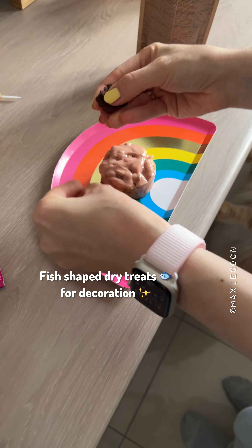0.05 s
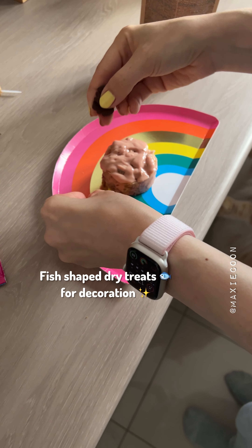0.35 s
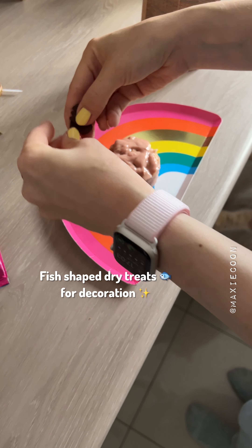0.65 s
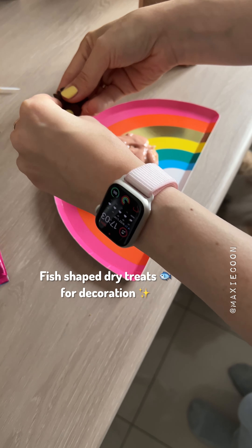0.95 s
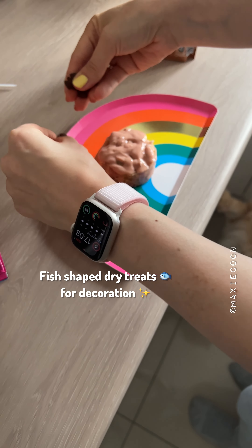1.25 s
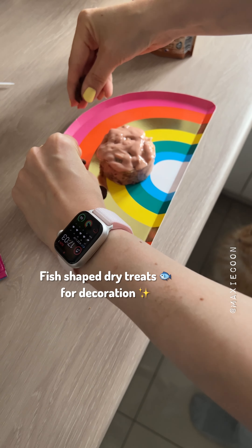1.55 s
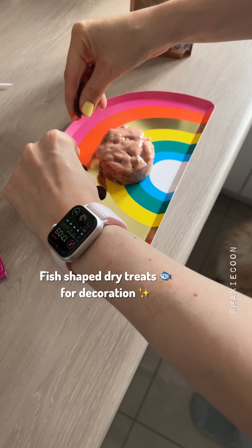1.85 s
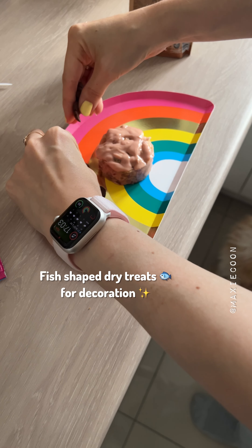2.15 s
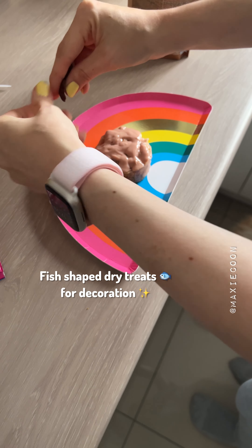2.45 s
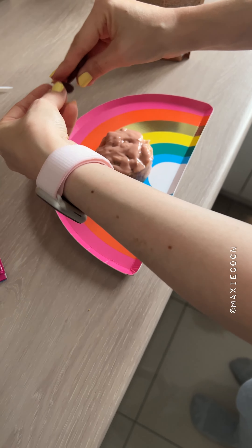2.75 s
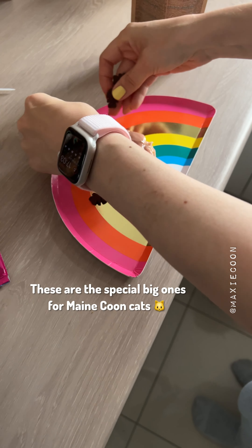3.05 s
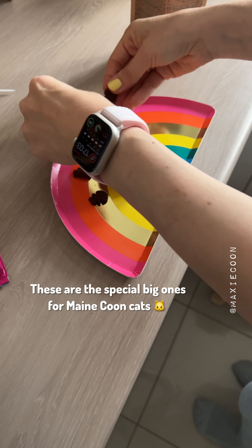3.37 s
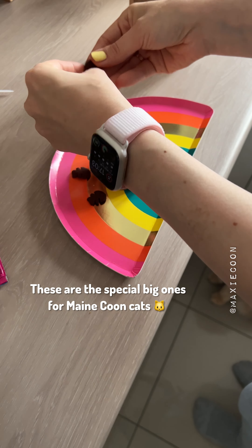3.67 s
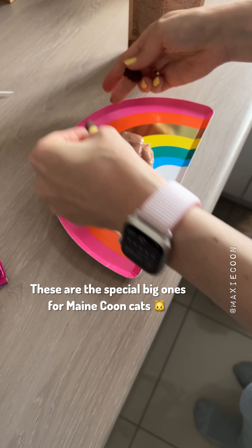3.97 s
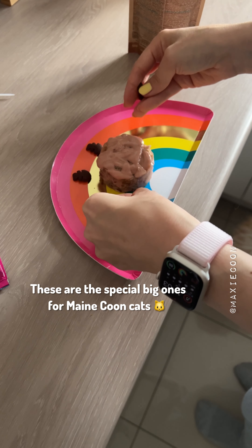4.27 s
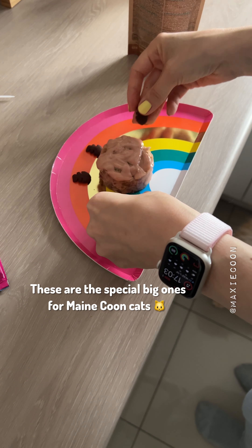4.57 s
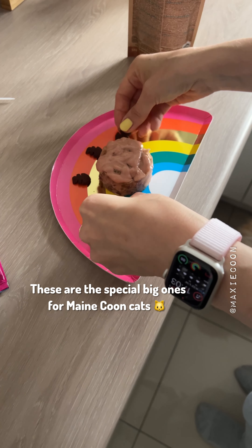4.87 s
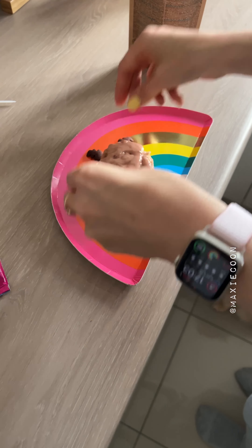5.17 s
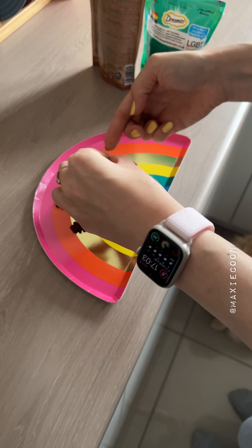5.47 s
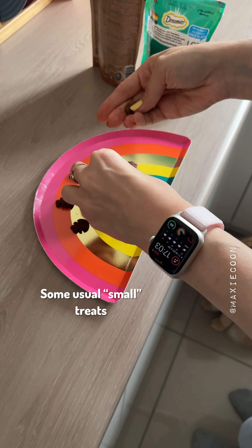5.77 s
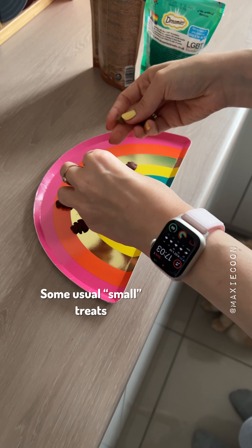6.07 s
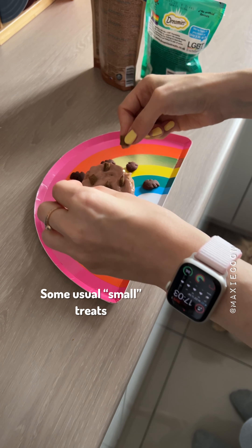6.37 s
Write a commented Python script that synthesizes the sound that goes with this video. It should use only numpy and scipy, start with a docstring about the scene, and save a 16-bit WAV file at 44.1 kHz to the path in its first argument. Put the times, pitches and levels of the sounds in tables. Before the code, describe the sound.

Dry treats tick together in a hand and land on a paper plate with crisp taps and faint scraping.

```python
"""Cat treats on a paper plate

Hard dry treats are picked from a hand and set one by one on a paper plate on a kitchen counter.
Each contact knocks the plate, snaps on the crust and rings the treat. In between, treats scrape,
fingers rub and a hand thumps the counter. A small kitchen answers, over faint hum and room noise."""
import sys
import numpy as np
from scipy import signal
from scipy.fft import rfft, irfft
from scipy.io import wavfile
from scipy.ndimage import uniform_filter1d

SR = 44100
rng = np.random.default_rng(int(sys.argv[2]) if len(sys.argv) > 2 else 0)


def unload_audio(sound):
    """Save the sound as a 16-bit wav file, at the path given as the first command line argument."""
    columns = np.transpose(np.atleast_2d(sound))
    # keep every value between -1 and 1, then stretch to whole-number steps
    steps = np.round(np.clip(columns, -1, 1) * 32767)
    wavfile.write(sys.argv[1], SR, steps.astype(np.int16))


N = 287550


def amp(db):
    """Decibels to gain."""
    return 10 ** (np.asarray(db) / 20)


def unit_rms(x):
    """Scales to rms 1."""
    return x / np.sqrt(np.mean(x ** 2) + 1e-20)


def curve(points, hz):
    """Reads a table on a log-frequency axis."""
    f, value = np.transpose(points)
    return np.interp(np.log(hz + 1), np.log(f + 1), value)


def add(mix, s, sound):
    """Mixes a sound in at time s."""
    part = mix[..., max(round(s * SR), 0):][..., :sound.shape[-1]]
    part += sound[..., :part.shape[-1]]


def sharpest_click(gain):
    """The minimum-phase impulse with this magnitude spectrum."""
    log_gain = np.log(np.maximum(np.r_[gain, gain[-2:0:-1]], 1e-5))
    return np.fft.ifft(np.exp(np.conj(signal.hilbert(log_gain)))).real


def stereo_pair(spectra, correlation, hz):
    """Blends two unrelated spectra to set the stereo width at each frequency."""
    same = np.clip(curve(correlation, hz), -1, 1)
    return np.array([spectra[0], same * spectra[0] + np.sqrt(1 - same ** 2) * spectra[1]])


# Room tone EQ: f/Hz, relative level/dB
AIR_EQ = [(15, -41), (27, -28), (38, -11.5), (53, -6.5), (76, -15), (108, -8.5), (135, -20), (212, -19),
          (300, -22), (450, -25.5), (700, -25.5), (2100, -35.5), (14000, -43.5), (16000, -54.5)]
# Room tone stereo image: f/Hz, left-right correlation
AIR_IMAGE = [(30, 1), (60, 0.77), (130, 0.39), (290, -0.25), (640, -0.87), (1400, -0.47), (3100, 0.59),
             (15000, -0.29)]
# The hiss level over time, with one brief dip: t/s, gain/dB
HISS_LEVEL = [(0, 1.5), (2.5, 0), (4.4, -0.5), (5.295, 1), (5.302, -19), (5.325, -0.5), (6.5, -2)]
# Mains hum partials: f/Hz, rms level/dB
MAINS_HUM = [(49.5, -69.5), (100, -78)]


def room_tone(air_db=-62, waver=0.23, split_hz=200):
    """Rumble and hiss under a mains hum that wavers in level and phase."""
    hz, t = np.fft.rfftfreq(N, 1 / SR), np.arange(N) / SR
    spectra = stereo_pair(rfft(rng.standard_normal((2, N))), AIR_IMAGE, hz) * amp(curve(AIR_EQ, hz))
    air = amp(air_db) * unit_rms(irfft(spectra, N))
    rumble = irfft(rfft(air) / (1 + (hz / split_hz) ** 4), N)
    hiss = (air - rumble) * amp(np.interp(t, *np.transpose(HISS_LEVEL)))
    knots = np.linspace(0, t[-1], num=40)
    drift = np.interp(t, knots, rng.standard_normal(len(knots)))
    hum = sum(amp(db) * np.sqrt(2) * np.sin(2 * np.pi * f * t + waver * drift) for f, db in MAINS_HUM)
    return rumble + hiss + hum * (1 + waver * drift)


# The plate's boxy knock: f/Hz, gain/dB
KNOCK_EQ = [(40, -17), (150, -11.5), (330, -4.5), (550, -3), (900, 0), (1400, -5.5), (2200, -13.5),
            (5000, -27), (16000, -57)]
# The crust's bright snap: f/Hz, gain/dB
SNAP_EQ = [(40, -32.5), (400, -20), (1000, -12), (1800, -5), (2700, -2), (4500, -0.5), (6000, -4.5),
           (8000, -13.5), (11000, -32.5), (16000, -51)]
# Fine grit on top: f/Hz, gain/dB
GRIT_EQ = [(40, -33.5), (1500, -23), (5000, -9.5), (7500, 0.5), (10000, -7.5), (13000, -4), (16000, -17.5)]


def contact(knock_db, snap_db, grit_db, ring_db, ring_hz, octaves, chatter_s,
            firm_s=0.0012, rise=0.47, size=4096):
    """A first touch and a quick chatter of the rough crust drive plate, crust and the treat's ring."""
    hz, t = np.fft.rfftfreq(size, 1 / SR), np.arange(size) / SR
    knock = amp(knock_db + curve(KNOCK_EQ, hz))
    snap = amp(snap_db + curve(SNAP_EQ, hz))
    grit = amp(grit_db + curve(GRIT_EQ, hz))
    ring = amp(ring_db) / (1 + abs(np.log2((hz + 1) / ring_hz) / octaves) ** 3)
    body = sharpest_click(np.linalg.norm([knock, snap, grit, ring], axis=0))
    # a gentle landing is all chatter; a firm one is mostly its first touch
    force = rng.standard_normal(size) * np.exp(-t / chatter_s) * (1 - np.exp(-t / (rise * chatter_s)))
    force *= chatter_s / firm_s / np.linalg.norm(force)
    force[0] += 1
    # the chatter smears the transient but leaves its broad colour alone
    spectrum = rfft(force)
    broad_power = uniform_filter1d(abs(spectrum) ** 2, size=50)
    spectrum *= rfft(sharpest_click(broad_power ** -.5))
    return signal.fftconvolve(irfft(spectrum), body)[:size]


# Treats tick on each other and on fingernails:
# t/s, snap/dB, grit/dB, ring/dB, ring/Hz, chatter/s, room send/dB
HAND_CLICKS = [ (0.1776, -48, -39, -30, 7000, 0.0021, 0), (0.191, -39, -30, -40, 8000, 0.0021, -4),
               (0.6720, -24, -24.5, -18.5, 2150, 0.0007, -2), (0.7282, -32, -24.5, -24, 2320, .0009, 5.5),
               (0.7724, -10.5, -32, 5.5, 2250, 0.0015, -4), (0.905, -35, -26.5, -18.5, 7040, 0.00046, -4.5),
               (1.0359, -44, -21.5, -14.5, 10600, .0005, -1), (1.057, -22.5, -23.5, -23, 8450, 0.006, 1.5),
               (1.1677, -28, -24.5, -19, 7700, .0015, -2), (1.1862, -12.5, -8.5, -2.5, 7360, 0.0036, -0.5),
               (1.364, -27.5, -28, -32, 8200, 0.0026, 0.5), (4.1507, -30, -34.5, -38, 5030, 0.0047, 0),
               (4.8018, -15.5, -31, -19, 6100, 0.0019, 1.5), ]


def hand_click(s, snap_db, grit_db, ring_db, ring_hz, chatter_s, send_db,
               octaves=0.22, overtone_ratio=1.81, overtone_db=-8):
    """A treat struck in the hand rings in two modes."""
    levels = np.array([snap_db - 17, snap_db, grit_db, ring_db])  # held in the fingers: little knock
    first = contact(*levels, ring_hz, octaves, chatter_s)
    second = contact(*(levels + overtone_db), ring_hz * overtone_ratio, octaves, chatter_s)
    return s, first + second, send_db


# A held treat is pressed against the plate: t/s, knock/dB, snap/dB, grit/dB, ring/Hz, chatter/s
PLATE_NUDGES = [ (0.2825, -6.5, -18.5, -15.5, 5860, .0019), (0.316, -12, -20, -35, 1300, 0.00078),
                (1.4664, -21, -28, -48.5, 3800, 0.0031), (1.5600, -42, -26.5, -43, 3680, 0.0032),
                (1.6333, -33.5, -18.5, -34, 3170, 0.0025), (1.8260, -12.5, -18, -40, 1530, 0.0026),
                (2.1273, -29, -27, -29.5, 3450, 0.0022), (2.138, -27, -19.5, -32.5, 3540, 0.0032),
                (2.8824, -21.5, -27.5, -32, 1520, .0029), (3.0996, -20, -27, -22.5, 1500, 0.0032),
                (4.6604, -6.5, -11, -23.5, 1060, 0.0011), (4.931, -7.5, -20, -26.5, 840, 0.0053),
                (5.095, -22.5, -36.5, -41, 5560, 0.0018), (5.1149, -3.5, -17.5, -22.5, 1030, 0.0067), ]


def nudge(s, knock_db, snap_db, grit_db, ring_hz, chatter_s, octaves=.22, send_db=4.5):
    """One touch on the plate, its ring damped by the fingers."""
    ring_db = snap_db + 4.5
    return s, contact(knock_db, snap_db, grit_db, ring_db, ring_hz, octaves, chatter_s), send_db


# Soft low thumps of a hand on the counter: t/s, lowest mode's level/dB, tilt/(dB per octave)
COUNTER_PUSHES = [(0.351, -54, 7), (1.6, -57, -6), (4.956, -46, -9.5)]
# The counter's modes: f/Hz, decay/s (twice the time to the peak)
COUNTER_MODES = [(108, 0.0187), (220, 0.022), (310, 0.015)]


def counter_push(db, tilt_db):
    """Each mode swells and dies within a few cycles; a quicker push wakes the higher ones."""
    t = np.arange(SR // 2) / SR
    thump = np.zeros(len(t))
    for hz, decay in COUNTER_MODES:
        gain = amp(db + tilt_db * np.log2(hz / COUNTER_MODES[0][0]))
        envelope = 2 * t / decay * np.exp(1 - 2 * t / decay)
        thump += gain * envelope * np.sin(2 * np.pi * hz * t)
    return thump


# The hero hits, a treat landing on its edge and tipping flat: t/s, knock/dB, snap/dB, grit/dB,
# edge ring/dB, edge ring/Hz, chatter/s, room send/dB, tip delay/s, flat ring/dB, flat ring/Hz
TREAT_LANDINGS = [ (0.352, -3.5, 1, -48, 2, 1600, 0.0016, -0.5, 0.0057, 9, 1660),
                  (0.4266, -11, 4, -9.5, -1.5, 2980, 0.0031, 2, .0065, 4.5, 3700),
                  (1.8303, -8.5, 4.5, -7, 14.5, 3390, 0.00082, 0.5, .0043, 13, 3796),
                  (3.3112, -9, 5, -6.5, 10, 5000, 0.0012, 0.5, .0023, 4.5, 3040), ]
PLATE_HZ = 1208  # the plate's springy note


def landing(s, knock_db, snap_db, grit_db, ring_db, ring_hz, chatter_s, send_db, tip_s, flat_db, flat_hz,
            spring_s=0.00107, halving_db=11):
    """The edge hits sharply, the plate gives and springs back, then the flat side comes down."""
    # the more freely a treat rings, the narrower its band
    edge_octaves = .58 * 2 ** (-ring_db / halving_db)
    flat_octaves = .36 * 2 ** (-flat_db / halving_db)
    # the edge itself hardly moves the plate
    edge = contact(knock_db - 7.5, snap_db, grit_db, ring_db, ring_hz, edge_octaves, chatter_s)
    spring = contact(knock_db, -np.inf, -np.inf, ring_db=snap_db - 7, ring_hz=PLATE_HZ,
                     octaves=0.36, chatter_s=chatter_s)
    # the flat side is duller, chatters longer and sits a little wetter
    flat = contact(knock_db + 1.5, snap_db - 8.5, grit_db - 8.5, flat_db, flat_hz,
                   flat_octaves, chatter_s * 1.9)
    return [(s, edge, send_db), (s + spring_s, spring, send_db), (s + tip_s, flat, send_db + 1.5)]


# Fingers brush skin and treats: t/s, length/s, level before trim/dB, centre/Hz, half-width/octaves
FINGER_STROKES = [(0.715, 0.044, -53.5, 11800, 0.41), (0.913, 0.055, -59, 6540, 0.37),
                  (1.034, 0.072, -54.5, 9650, 0.61), (1.414, 0.042, -58, 4870, 0.43),
                  (2.667, 0.23, -68.5, 9000, 3.3), (3.057, 0.08, -64.5, 8000, .5),
                  (3.674, 0.087, -70, 9050, 1.5), (3.804, 0.17, -70, 6960, 0.45),
                  (3.914, 0.77, -75, 8080, 1.2), (4.689, 0.035, -57.5, 8900, 0.2)]


def rub(length, db, centre_hz, octaves, grains_per_s=4000, rise=.2, skirt=1.822,
        grain_db=2.5, catch_db=5, catch_s=0.0056):
    """Tiny slips of a rough surface come in clumps as it catches, swelling and fading with the stroke."""
    t = np.arange(SR) / SR
    slips = rng.standard_normal(SR) * (rng.random(SR) < grains_per_s / SR)
    sizes_db = grain_db * np.minimum(rng.exponential(1, SR), 3)
    catches = rng.uniform(-0.92, 1, size=400)
    grip = np.interp(t / catch_s, np.arange(len(catches)), catches)
    slips *= amp(sizes_db + catch_db * grip)
    stroke = np.interp(t / length, [0, rise, 1, 1.1], [0.35, 0.86, 0.19, 0.019])
    off_centre = abs(np.log2((np.fft.rfftfreq(SR, 1 / SR) + 1) / centre_hz) / octaves)
    friction = irfft(rfft(slips * stroke) / (1 + off_centre ** skirt), SR)
    return amp(db) * unit_rms(friction[:int(length * SR)])


# A treat drags over the plate: t/s, length/s, crust level before trim/dB
PLATE_SCRAPES = [(1.472, 0.032, -61.5), (1.555, 0.14, -62.5), (1.654, 0.16, -56.5), (1.788, 0.12, -57.5),
                 (1.993, .13, -62.5), (2.147, 0.038, -61.5), (3.097, 0.065, -56), (3.14, .05, -53.5),
                 (3.266, 0.1, -58), (4.391, 0.41, -73.5), (4.638, 0.03, -57.5), (4.914, 0.015, -65),
                 (5.015, 0.049, -61.5), (5.106, 0.058, -60), (6.322, 0.093, -76.5)]


def scrape(length, db):
    """The slipping crust sings in its own band and also shakes the plate."""
    crust = rub(length, db, centre_hz=3757, octaves=0.42, grains_per_s=3300, rise=0.13, skirt=1.7)
    plate = rub(length, db - 11, centre_hz=PLATE_HZ, octaves=.6, skirt=3.076)
    return crust + plate


# Phase stray between the two microphone ports: f/Hz, rms phase/rad
PORT_STRAY = [(100, 0.13), (500, 0.95), (1300, .25), (2400, 0.8), (4500, 0.82), (16000, 0.87)]


def microphone_ports(x, lag_s=.000017, ripple_hz=900, balance_db=0.6):
    """Two microphone ports hear the same wave, a hair apart and bent differently around the case."""
    hz = np.fft.rfftfreq(N, 1 / SR)
    ripple = np.sin(2 * np.pi * (hz / ripple_hz + rng.random())) * np.sqrt(2)
    phase = 2 * np.pi * hz * lag_s + ripple * curve(PORT_STRAY, hz)
    sides = np.array([[-1], [1]])
    return irfft(rfft(x) * np.exp(.5j * sides * phase), N) * amp(-balance_db * sides)


# The kitchen's short tail: f/Hz, T60/s
REVERB_TIMES = [(100, 0.11), (400, 0.35), (1000, 0.27), (3500, 0.24), (6000, 0.21), (9000, .17),
                (16000, 0.049)]
# The tail's stereo image: f/Hz, left-right correlation
REVERB_IMAGE = [(100, .75), (350, 0.22), (700, 0.44), (1050, 1), (1600, 0.87), (2400, 0.7), (5000, 0.053),
                (16000, 0.12)]


def kitchen(x, predelay_s=0.0007, early_db=4, early_s=0.024, taps_per_s=5000):
    """Dense reflections, strongest from the near counter and cupboards; each band dies at its own rate."""
    count = SR // 2
    t = np.arange(count) / SR
    taps = rng.standard_normal((2, count)) * (rng.random((2, count)) < taps_per_s / SR)
    taps *= (t > predelay_s) * amp(early_db * np.exp(-t / early_s))
    hz, when, bands = signal.stft(taps, SR, nperseg=256)
    bands = bands.transpose(0, 2, 1) * amp(-60 * when[:, None] / curve(REVERB_TIMES, hz))
    bands = stereo_pair(bands, REVERB_IMAGE, hz)
    energy = (abs(bands) ** 2).sum(1, keepdims=True)
    bands /= np.sqrt(uniform_filter1d(energy, size=3, axis=2))  # keeps the overall colour neutral
    tail = signal.istft(bands.transpose(0, 2, 1), SR, nperseg=256)[1]
    return signal.oaconvolve(x[None], tail / np.linalg.norm(tail[0]), axes=1)[:, :N]


def scene(friction_trim_db=-2, push_send_db=-9, spots=5):
    """Contacts, rubs and pushes reach the microphones directly and, from a few spots, via the room."""
    # each cue: t/s, sound, room send/dB
    cues = [touch for row in TREAT_LANDINGS for touch in landing(*row)]
    cues += [nudge(*row) for row in PLATE_NUDGES]
    cues += [hand_click(*row) for row in HAND_CLICKS]
    cues += [(s, amp(friction_trim_db) * scrape(*row), 0) for s, *row in PLATE_SCRAPES]
    cues += [(s, amp(friction_trim_db) * rub(*row), 0) for s, *row in FINGER_STROKES]
    cues += [(s, counter_push(*row), push_send_db) for s, *row in COUNTER_PUSHES]
    direct, sends = np.zeros(N), np.zeros((spots, N))
    for k, (s, sound, send_db) in enumerate(cues):
        add(direct, s, sound)
        add(sends[k % spots], s, sound * amp(send_db))
    return microphone_ports(direct) + sum(kitchen(send) for send in sends) + room_tone()


def record(dry, cutoff_hz=16100):
    """A steep high cut on the whole mix."""
    high_cut = signal.firwin(511, cutoff_hz, window=("kaiser", 9), fs=SR)
    return signal.oaconvolve(dry, high_cut[None], "same")


dry = scene()
out = record(dry)
unload_audio(out)
```